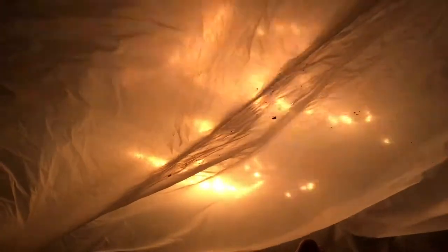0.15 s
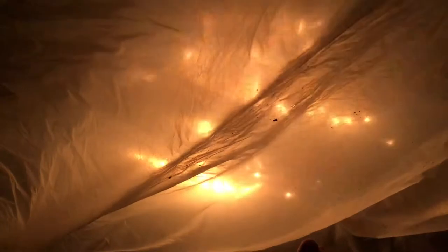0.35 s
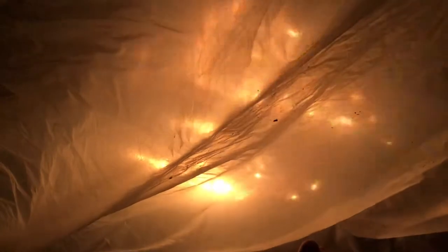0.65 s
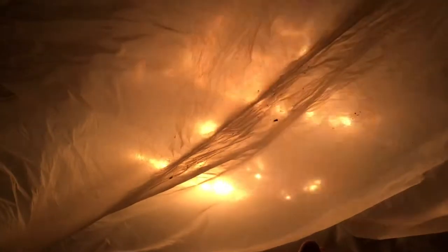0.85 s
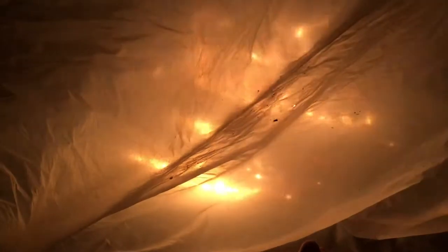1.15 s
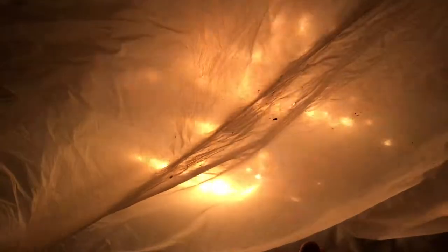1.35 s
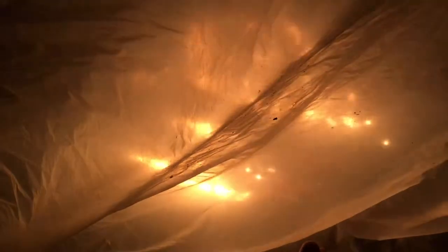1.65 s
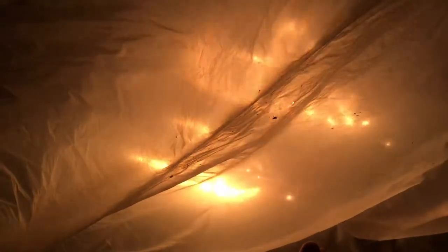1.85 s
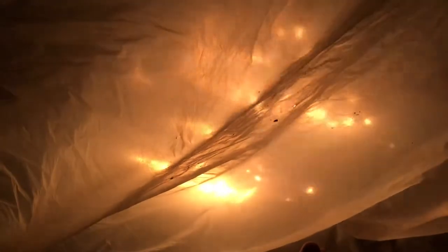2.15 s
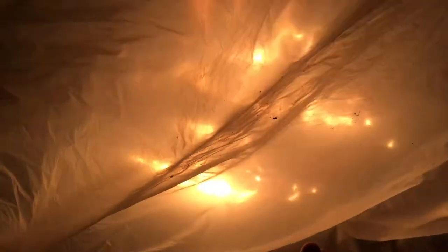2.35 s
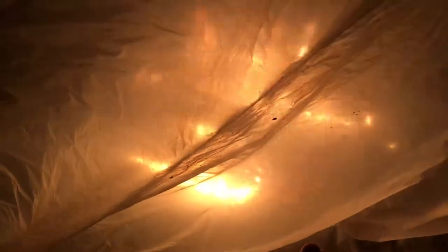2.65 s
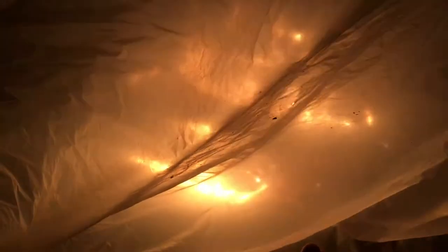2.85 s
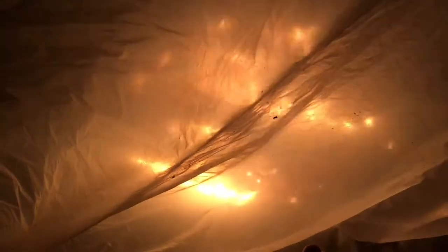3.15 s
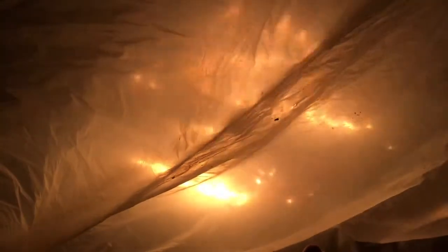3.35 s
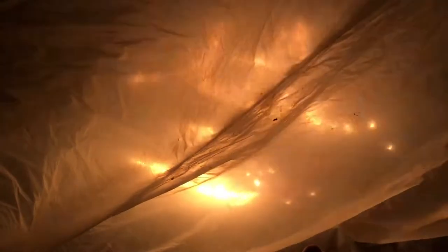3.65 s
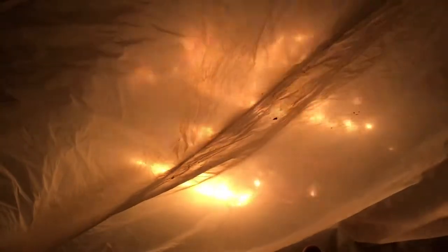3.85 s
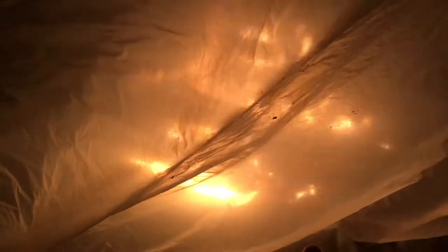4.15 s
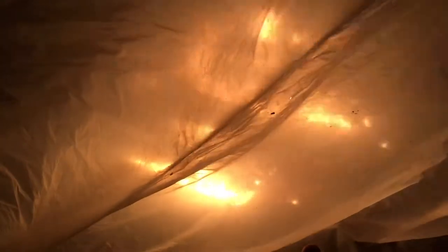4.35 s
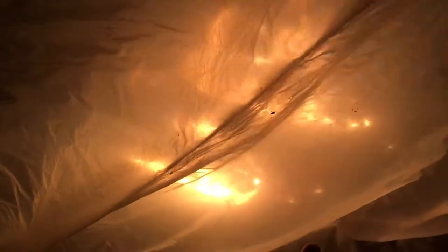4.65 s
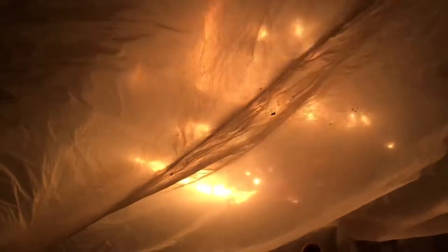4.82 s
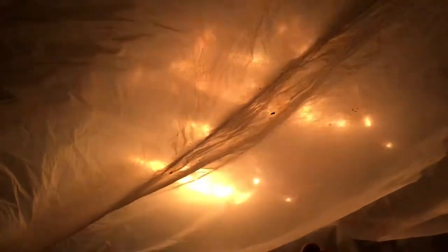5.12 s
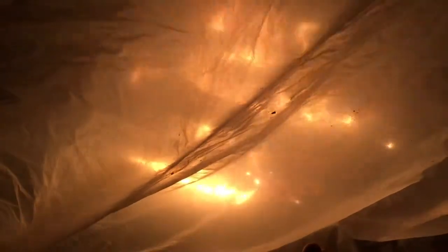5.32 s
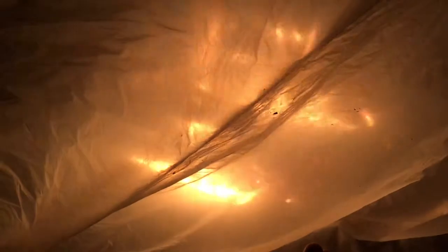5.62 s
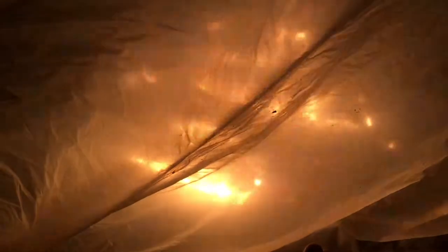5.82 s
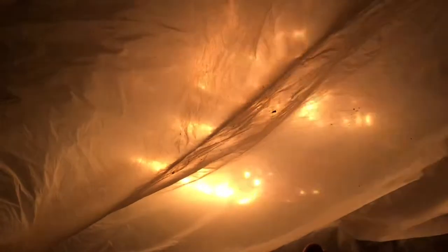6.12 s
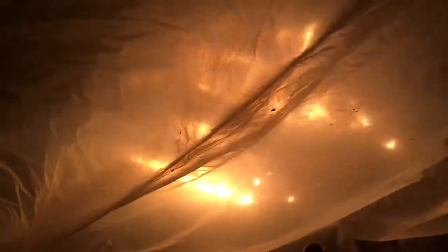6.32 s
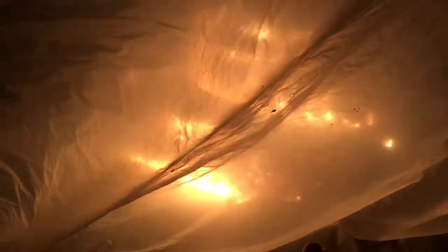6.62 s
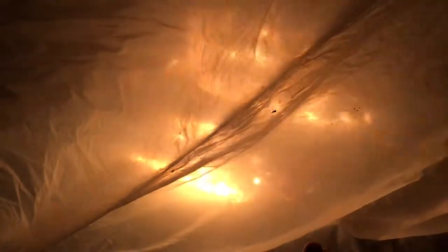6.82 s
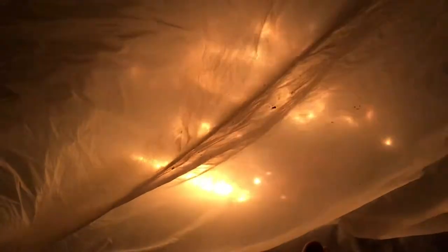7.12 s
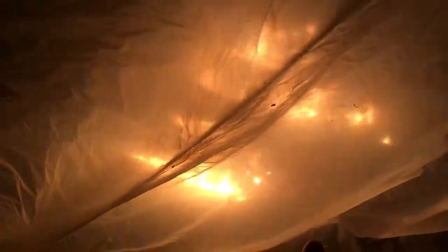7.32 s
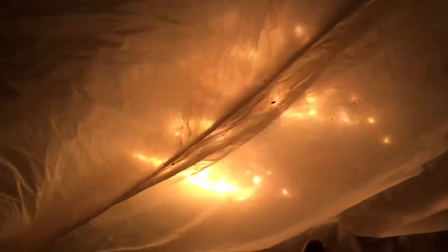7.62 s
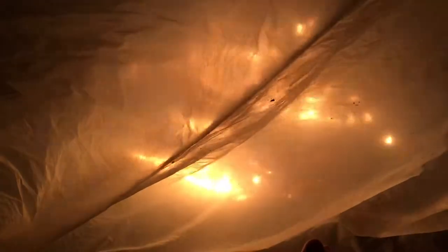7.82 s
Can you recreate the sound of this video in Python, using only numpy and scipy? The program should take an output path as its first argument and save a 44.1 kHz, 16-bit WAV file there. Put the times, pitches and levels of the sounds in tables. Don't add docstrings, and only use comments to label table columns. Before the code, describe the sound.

Close under a plastic sheet outdoors at night, hard rain drums steadily with a deep membrane rumble, dense pattering taps and a fine high hiss. A nearby wood fire ticks and spits brightly. A loud crack comes early on, duller pops follow, then a cluster of sharp snaps near the end, the first the loudest. Fat drips thud softly on slack plastic. The microphone is close and dry, with almost no echo.

```python
import sys
import numpy as np
from scipy import signal
from scipy.fft import rfft, irfft, next_fast_len
from scipy.io import wavfile
from scipy.ndimage import uniform_filter1d, map_coordinates

SR = 44100
rng = np.random.default_rng(int(sys.argv[2]) if len(sys.argv) > 2 else 0)


def log_audio(samples):
    frames = np.atleast_2d(samples).T
    limited = np.clip(frames, -1, 1)
    pcm = np.round(limited * 32767).astype(np.int16)
    wavfile.write(sys.argv[1], SR, pcm)


def boost_factor(decibels):
    exponent = np.asarray(decibels, float) / 20
    return 10 ** exponent


N = 351477

# (time [s], strength [dB])
GUSTS = [(0.0, 1.5), (0.4, -1), (1.1, 1), (1.75, 0.5), (2.1, .5), (3.37, -1.5), (3.7, -.5), (4.13, 2.5),
         (4.5, -0.1), (5.3, 0), (6.0, 0), (6.26, 1), (6.73, -1), (7.06, .5), (7.6, -0.5), (7.97, -2)]
# (frequency [Hz], density [dB per Hz])
BOOM_SPECTRUM = [(15, -61), (25, -35), (53, -2.5), (86, -0.5), (114, -1), (194, -3), (317, -10),
                 (343, -20.5), (397, -12.5), (454, -20), (600, -33.5), (780, -55), (1320, -120)]
# (frequency [Hz], density [dB per Hz])
PATTER_SPECTRUM = [(280, -28.5), (480, -4.5), (1030, -1.5), (1140, -3), (1240, -2.5), (2250, -8),
                   (3180, -11.5), (4500, -16.5), (5850, -37), (9900, -120)]
# (frequency [Hz], density [dB per Hz])
HISS_SPECTRUM = [(2650, -29.5), (4500, -5), (5290, -1.5), (7050, -6.5), (14000, -14.5), (15100, -11.5),
                 (15700, -14)]
# (time [s], energy [dB], pitch [Hz], t60 [s])
HEAVY_DROPS = [(0.0532, -27.5, 1220, 0.021), (0.2534, -27.5, 1390, 0.022), (0.274, -29, 1750, 0.012),
               (0.4399, -29.5, 1400, 0.018), (0.852, -25, 1600, .013), (1.092, -14, 1450, .028),
               (1.1197, -30, 1650, .014), (1.348, -20, 1500, 0.039), (1.4878, -26, 1160, 0.022),
               (1.6817, -27, 1510, .04), (1.8631, -24.4, 1300, 0.018), (1.979, -26, 1670, .034),
               (2.7403, -26.5, 1600, 0.0086), (3.2769, -29, 1600, .012), (3.6193, -25, 1260, 0.06),
               (3.7525, -26.5, 1550, 0.018), (4.176, -25.5, 1650, 0.052), (4.2194, -31, 1300, .018),
               (4.4596, -25, 1800, 0.011), (5.0297, -28, 1310, 0.029), (5.352, -26.5, 1130, 0.017),
               (5.4966, -24, 1170, 0.014), (5.552, -27.5, 1730, .013), (5.722, -26.5, 1730, 0.025),
               (6.2282, -24, 1170, 0.014), (6.62, -28, 1310, .013), (7.128, -27, 1250, .012),
               (7.5434, -31, 1800, 0.013), (7.7568, -24, 1430, .021), (7.8703, -28, 1420, .018)]
# (time [s], peak [dB], pitch [Hz])
FAT_DRIPS = [
    (1.09, -31.5, 398),
    (2.99, -44, 264),
    (4.03, -50, 260),
    (7.15, -37, 275),
    (7.316, -34.5, 204),
    (7.502, -46, 248),
]
# (time [s], energy [dB], pitch [Hz])
SPLITS = [(4.447, -27, 5600), (0.2727, -22, 6300), (0.335, -36, 8800), (0.5749, -30.5, 7900),
          (0.885, -30, 6400), (1.0755, -42, 8400), (1.092, -27, 6600), (1.3486, -30, 5300),
          (1.377, -33, 7700), (1.3908, -29, 8350), (3.167, -33, 8700), (3.2452, -36, 8200),
          (3.3663, -35.9, 8600), (3.4006, -35, 9000), (3.55, -22.5, 7550), (3.6624, -27, 5670),
          (3.8234, -31.5, 10500), (3.9206, -34, 5700), (4.4527, -24, 6300), (4.46, -27.5, 7300),
          (4.8183, -29, 9000), (5.0125, -31.5, 9900), (5.5003, -31, 6840), (6.3293, -29, 7900),
          (6.3411, -34, 8600), (6.4875, -31, 7000), (6.5903, -35, 9000), (6.6155, -27.5, 6800),
          (6.7197, -25.5, 8200), (7.0789, -33, 10200)]
# (time [s], energy [dB])
SAP_SPITS = [(0.1675, -47), (0.1822, -40), (0.2, -38), (0.6615, -43), (0.677, -47), (0.6959, -39),
             (1.1309, -40.5), (1.2968, -41), (1.4464, -37), (2.3442, -41), (2.3813, -46), (2.829, -43),
             (3.0053, -42), (3.3485, -40), (3.8627, -44), (3.912, -47), (4.0155, -45), (4.1282, -40),
             (4.49, -46), (4.786, -45), (5.085, -36), (5.7238, -43), (6.188, -40), (6.2827, -38),
             (6.6985, -32), (6.942, -42), (7.246, -33), (7.295, -42), (7.4318, -37), (7.904, -41)]
# (time [s], energy at the pitch [dB per kHz], pitch [Hz],
# fall below the pitch [dB per octave], fall above the pitch [dB per octave])
BURSTS = [
    (1.2112, -27.5, 2500, 2.5, 3.3),
    (1.7585, -4.5, 3250, 2, 5.8),
    (2.754, -12.5, 1800, 0, 2),
    (5.2082, -15.5, 2300, 0, 11),
    (6.3524, 1.5, 3800, 9.5, 1.6),
    (6.4625, -10.5, 3240, 0.7, 4.1),
    (6.972, -1.5, 2200, 2, 4.3),
    (7.185, -6, 4000, 1.1, 3.8),
]
# (low edge [Hz], high edge [Hz])
POP_BANDS = [
    (240, 1000),
    (1000, 2200),
    (2200, 4000),
    (4000, 6500),
    (6500, 11000),
    (11000, 17000),
]
# (level [dB], t60 [s])
SHELTER_FLUTTER = [
    (-23.5, 0.034),
    (-34.5, 0.025),
    (-26, 0.027),
    (-29.5, 0.045),
    (-23.5, 0.04),
    (-31, 0.041),
]
# (delay [s], level [dB])
REFLECTIONS = [
    (0.0004, -1),
    (0.00065, -6),
    (0.0017, -25.5),
    (0.0024, -15.5),
]
# (frequency [Hz], gain [dB])
POP_COLOUR = [(5300, 0.5), (6600, -1), (8000, -1.5), (11000, -2), (14500, 2.5)]
# (frequency [Hz], gain [dB])
BAND_LIMIT = [(15650, 0), (15950, -11), (16500, -20), (16900, -45), (17150, -90)]

TOP_HZ, QUIET_TOP_HZ = 16000, 15850
BOOM_DB, PATTER_DB, HISS_DB = -48, -57, -70.5
PATTER_FOLLOWS, HISS_FOLLOWS = 0.15, 0.25


def unit(x):
    return x / np.sqrt(np.mean(x ** 2) + 1e-20)


def curves(rows):
    s, *cols = np.transpose(rows)
    return [np.interp(np.arange(N) / SR, s, c) for c in cols]


def wobble(rate):
    knots = rng.standard_normal(int(N * rate / SR) + 4)
    return map_coordinates(knots, [np.arange(N) * rate / SR])


def rush(spectrum, patchy_db):
    z = signal.stft(rng.standard_normal(N + 512), nperseg=512)[2]
    field = uniform_filter1d(rng.standard_normal(z.shape), size=8, axis=0)
    field = uniform_filter1d(field, size=4, axis=1)
    x = signal.istft(z * boost_factor(patchy_db * unit(field)), nperseg=512)[1][:N]
    m = next_fast_len(N + 8192)
    f, db = np.transpose(spectrum)
    hz = np.fft.rfftfreq(m, 1 / SR)
    gain = boost_factor(np.interp(np.log(hz + 1), np.log(f + 1), db)) * (hz < QUIET_TOP_HZ)
    return unit(irfft(rfft(x, m) * gain, m)[:N])


def place(s, rows):
    at = np.round(np.asarray(s) * SR).astype(int)[:, None] + np.arange(rows.shape[1])
    return np.bincount(at.ravel(), rows.ravel(), minlength=N)[:N]


def band(x, lo_hz, hi_hz, order=3):
    y = signal.sosfilt(signal.butter(order, [lo_hz, hi_hz], "band", fs=SR, output="sos"), x)
    return y / np.linalg.norm(y)


def quiet(x):
    return irfft(rfft(x) * (np.fft.rfftfreq(len(x), 1 / SR) < QUIET_TOP_HZ), len(x))


def taps(s, db, hz, t60, sag, rough, size):
    t = np.arange(size) / SR
    hz, t60, db = (np.asarray(v)[:, None] for v in (hz, t60, db))
    turns = hz * (t + sag * (1 - np.exp(-hz * t)) / hz)
    ragged = uniform_filter1d(rng.standard_normal((len(s), size)), size=7, axis=1).cumsum(axis=1)
    decay = boost_factor(db - 60 * t / np.maximum(t60, 0.002))
    return place(s, decay * np.sin(2 * np.pi * turns + rough * ragged))


def boom(wind_db):
    return boost_factor(BOOM_DB + wind_db + 1.0 + 0.85 * wobble(6.7)) * rush(BOOM_SPECTRUM, patchy_db=0.48)


def droplets():
    u = rng.random((9000, 2))
    size = boost_factor(-5.5 * np.log(1 - u[:, 1:]).clip(-2.2))
    ticks = place(u[:, 0] * N / SR, size * rng.standard_normal((len(u), 24)))
    return unit(signal.sosfilt(signal.butter(1, [2600, 7500], "band", fs=SR, output="sos"), ticks))


def hiss(wind_db, gust):
    level_db = HISS_DB + HISS_FOLLOWS * wind_db - 0.24 + 1.1 * gust
    return boost_factor(level_db) * unit(rush(HISS_SPECTRUM, patchy_db=2.0) + boost_factor(-5.5) * droplets())


def patter(wind_db, gust):
    patter_db = PATTER_DB + PATTER_FOLLOWS * wind_db
    wash = boost_factor(patter_db - 1.83 + 0.95 * gust) * rush(PATTER_SPECTRUM, patchy_db=2.0)
    u, z = rng.random((5000, 2)), rng.standard_normal((5000, 2))
    hz = np.clip(1750 * np.exp(0.611 * z[:, 0]), 500, 9000)
    size_db = np.minimum(-3.5 * np.log(1 - u[:, 1]), 11) - 3 * np.log2(hz / 1000)
    t60 = 9 * np.exp(0.75 * z[:, 1]) / hz
    near = taps(u[:, 0] * N / SR, size_db, hz, t60, sag=0.66, rough=0.26, size=600)
    return wash + boost_factor(patter_db - 3.0) * unit(near)


def rain():
    wind_db, = curves(GUSTS)
    gust = wobble(14)
    return boom(wind_db) + hiss(wind_db, gust) + patter(wind_db, gust)


def heavy_drops():
    t = np.arange(2200) / SR
    when, z = rng.random(140) * N / SR, rng.standard_normal((140, 3)).clip(-2, 2)
    light_db = -33.5 + 2.5 * z[:, 0]
    light_hz, light_t60 = 1600 * np.exp(0.2 * z[:, 1]), 0.017 * np.exp(0.35 * z[:, 2])
    drops = np.r_[HEAVY_DROPS, np.c_[when, light_db, light_hz, light_t60]]
    patches = []
    for s, db, hz, t60 in drops:
        shake = 3.0 * (t == 0) + boost_factor(-60 * t / (1.96 * t60)) * rng.standard_normal(len(t))
        patches.append(boost_factor(db + 2.9) * band(shake, hz / 4.04, hz * 1.96))
    khz = np.fft.rfftfreq(len(t), 1000 / SR).clip(0.3)
    ripple_lag_s = 0.00159
    dispersion = np.exp(2j * np.pi * 1000 * ripple_lag_s / khz)
    return place(drops[:, 0] - 0.0008, irfft(rfft(np.array(patches)) * dispersion, len(t)))


def drips():
    s, db, hz = np.transpose(FAT_DRIPS)
    fat = taps(s + 0.00367, db - 2.5, hz, 20.0 / hz, sag=0.98, rough=0.0086, size=2600)
    u = rng.random((90, 3))
    t60 = np.full(len(u), 0.018)
    far = taps(u[:, 0] * N / SR, -50 + 7 * u[:, 1], 200 + 250 * u[:, 2], t60, sag=0.7, rough=0.01, size=2000)
    return fat + far


def tick(hz):
    t = np.arange(2200) / SR
    decay = boost_factor(-60 * t / 0.0075) + boost_factor(-12.0 - 60 * t / 0.079)

    def split():
        return 4 * (t == 0) + decay * rng.standard_normal(len(t))

    body = band(split(), hz / 2.4, min(hz * 1.34, TOP_HZ))
    return body + boost_factor(-8.5) * band(split(), 10500, TOP_HZ)


def crackles():
    rows = list(SPLITS) + [(s, db, 10500) for s, db in SAP_SPITS]
    ticks = np.array([boost_factor(db - 1.6) * tick(hz) for s, db, hz in rows])
    u = rng.random((350, 3))
    faint = np.array([boost_factor(-52.5 + 8 * b * b) * tick(5000 + 9000 * c) for a, b, c in u])
    return place([row[0] for row in rows], ticks) + place(u[:, 0] * N / SR, faint)


def pop_shock(t):
    shock = (t == 0) + boost_factor(-9.0 - 60 * t / 0.004) * rng.standard_normal(len(t))
    for late, db in REFLECTIONS:
        shock[round(late * SR * rng.uniform(0.97, 1.03))] += boost_factor(db)
    return shock


def pop_flutter(t, levels):
    air = quiet(rng.standard_normal(len(t)))
    swell = 1 - np.exp(-t / 0.0024)
    trees = boost_factor(-54.5 - 60 * t / 0.22)
    flutter = np.zeros(len(t))
    for db, edges, (wet_db, t60) in zip(levels, POP_BANDS, SHELTER_FLUTTER):
        decay = boost_factor(wet_db - 60 * t / t60) + trees
        flutter += boost_factor(db) * swell * decay * unit(band(air, *edges))
    return flutter


def pops():
    t, rows = np.arange(8800) / SR, []
    hz = np.fft.rfftfreq(len(t), 1 / SR).clip(150)
    lo, hi = np.transpose(POP_BANDS)
    lows_late = np.exp(2j * np.pi * 480 / hz) * hz ** 2 / (hz ** 2 + 300 ** 2)
    for s, top_db, pitch_hz, below, above in BURSTS:
        def slope(f):
            fall = np.maximum(below * np.log2(pitch_hz / f), above * np.log2(f / pitch_hz))
            return top_db - fall + np.interp(f, *np.transpose(POP_COLOUR))

        levels = slope(np.sqrt(lo * hi)) + 10 * np.log10((hi - lo) / 1000)
        shock = pop_shock(t)
        colour = boost_factor(slope(hz)) / np.sqrt(uniform_filter1d(np.abs(rfft(shock)) ** 2, size=450))
        blow = irfft(rfft(np.roll(shock, shift=44)) * colour * lows_late, len(t))
        blow *= boost_factor(-0.03) * np.linalg.norm(boost_factor(levels)) / np.linalg.norm(blow)
        rows.append(blow + np.roll(pop_flutter(t, levels), shift=44))
    return place([row[0] - 0.0009 for row in BURSTS], np.array(rows))


def scene():
    return (rain() + pops() + quiet(heavy_drops() + drips() + crackles()))[None]


def band_limit(x):
    return signal.sosfilt(signal.butter(12, 17120, fs=SR, output="sos"), x)


def record(dry):
    x = signal.sosfilt(signal.butter(2, 38, "high", fs=SR, output="sos"), dry)
    ceiling = 1.2
    x = x / (1 + np.abs(x / ceiling) ** 6) ** (1 / 6)
    m = next_fast_len(N + 8192)
    gain = boost_factor(np.interp(np.fft.rfftfreq(m, 1 / SR), *np.transpose(BAND_LIMIT)))
    mix = irfft(rfft(x, m) * gain, m)[:, :N]
    return band_limit(mix)


dry = scene()
out = record(dry)
log_audio(out)
```